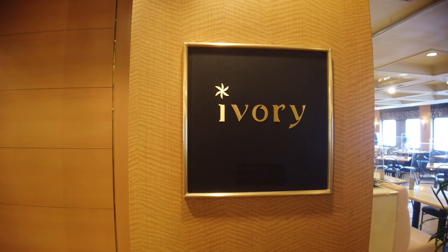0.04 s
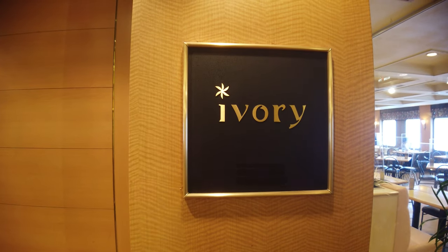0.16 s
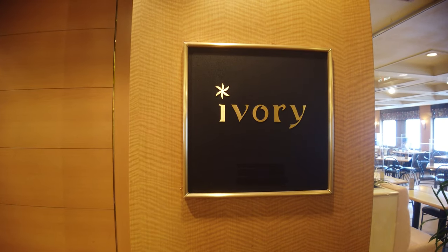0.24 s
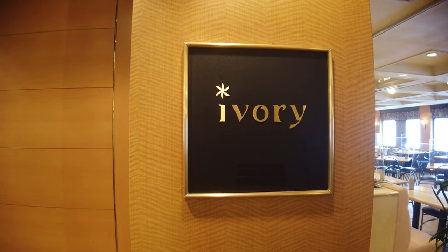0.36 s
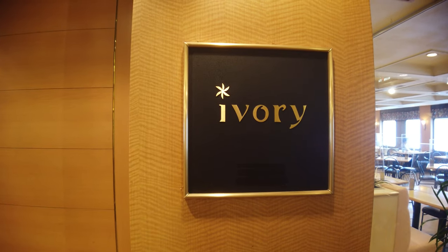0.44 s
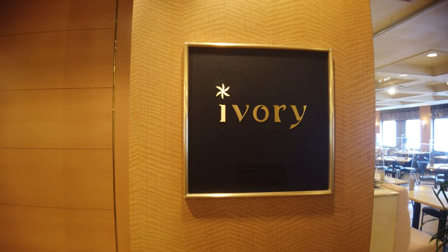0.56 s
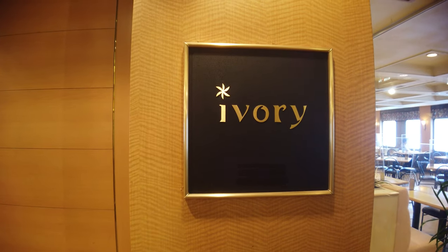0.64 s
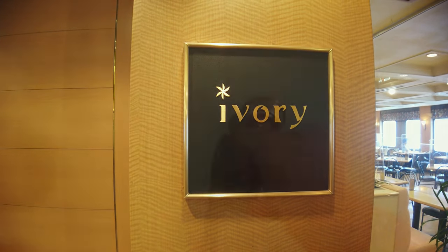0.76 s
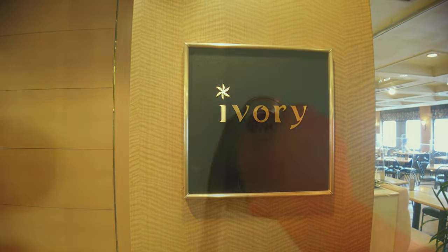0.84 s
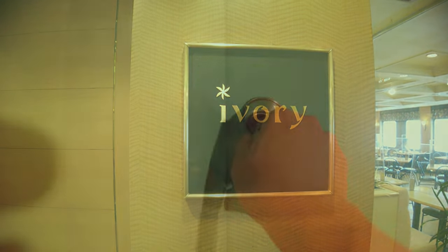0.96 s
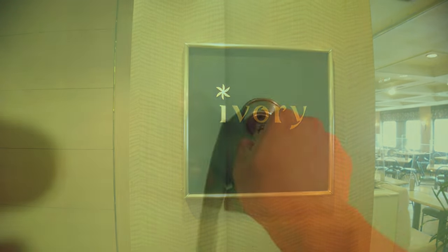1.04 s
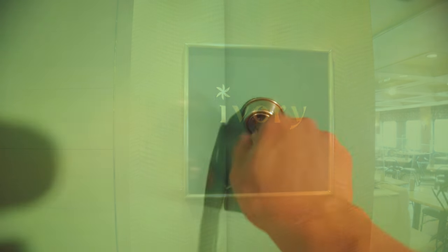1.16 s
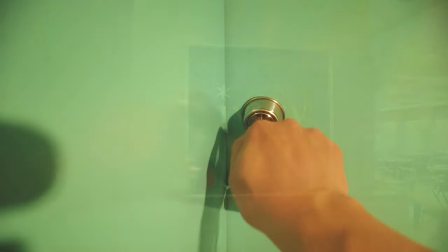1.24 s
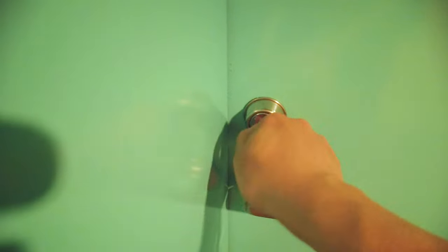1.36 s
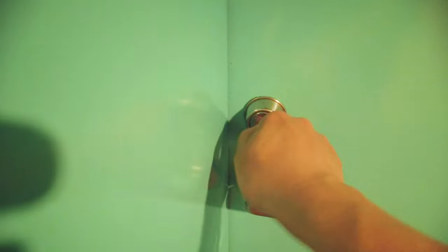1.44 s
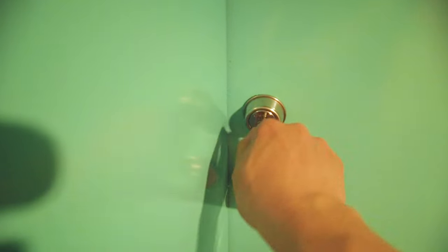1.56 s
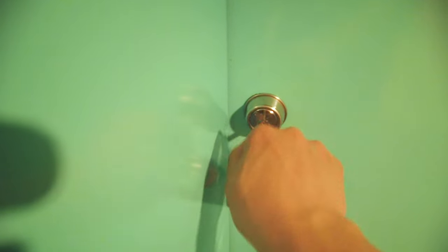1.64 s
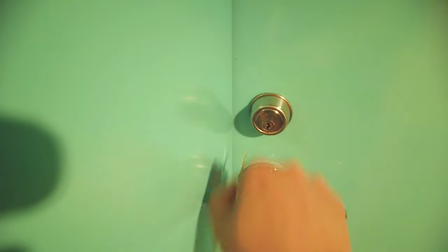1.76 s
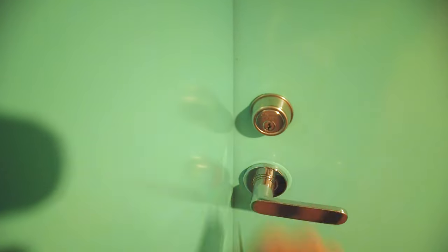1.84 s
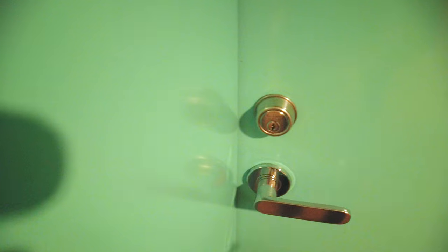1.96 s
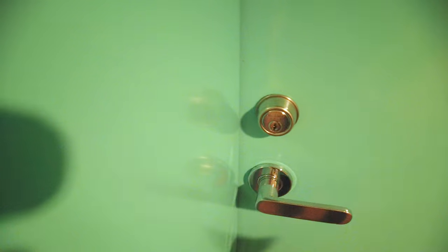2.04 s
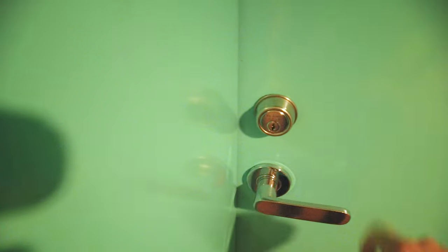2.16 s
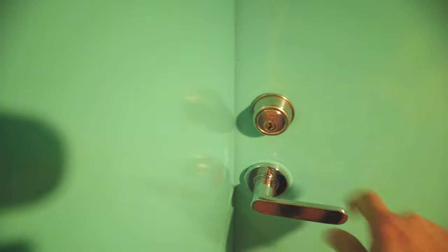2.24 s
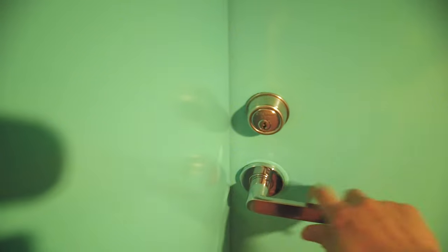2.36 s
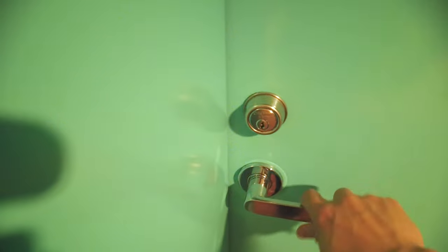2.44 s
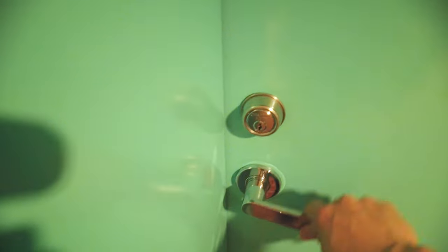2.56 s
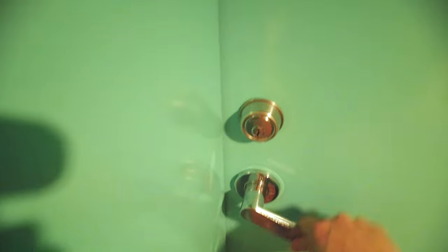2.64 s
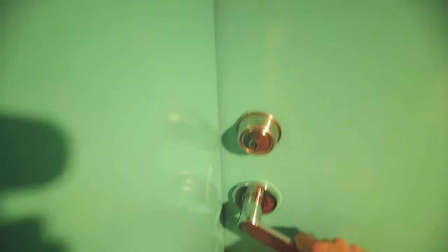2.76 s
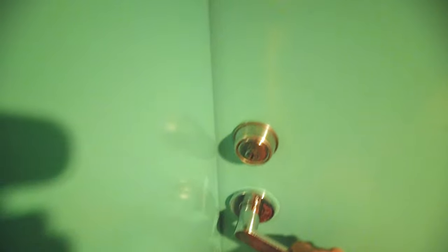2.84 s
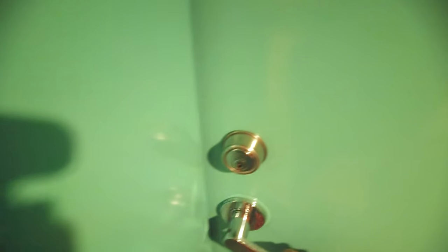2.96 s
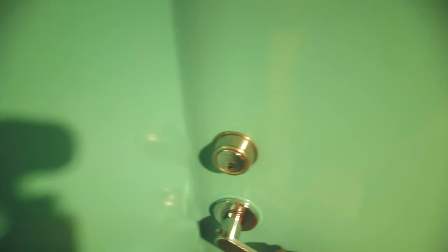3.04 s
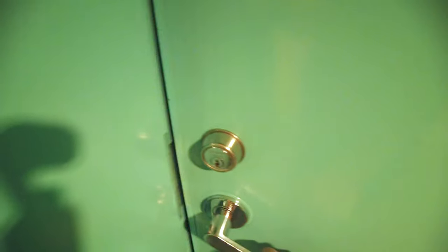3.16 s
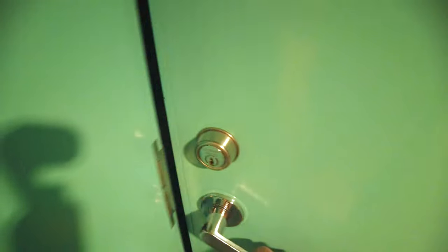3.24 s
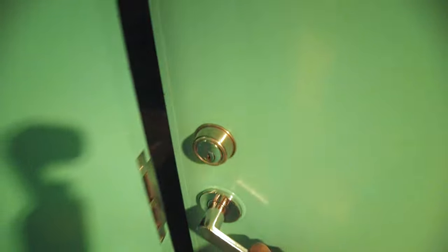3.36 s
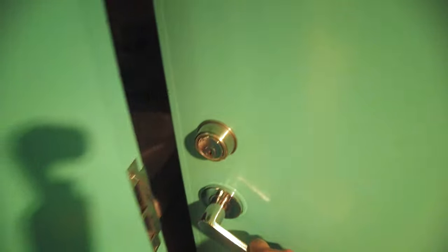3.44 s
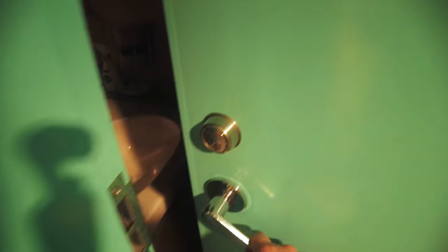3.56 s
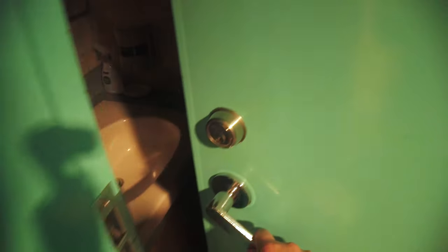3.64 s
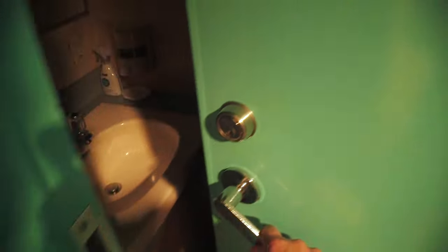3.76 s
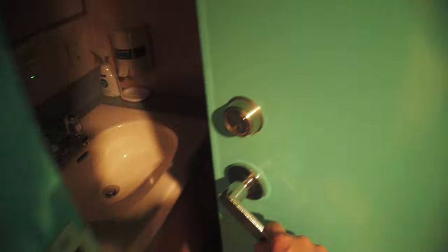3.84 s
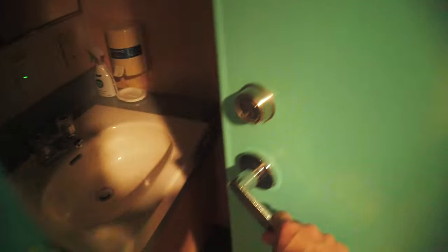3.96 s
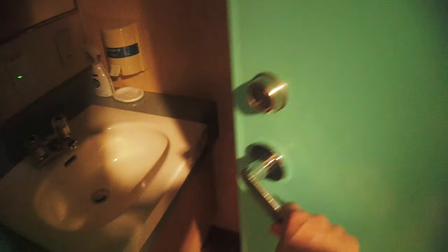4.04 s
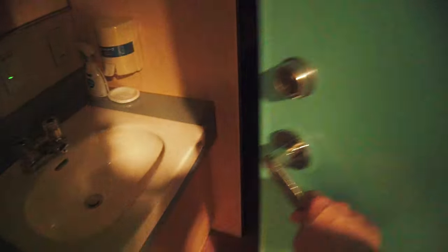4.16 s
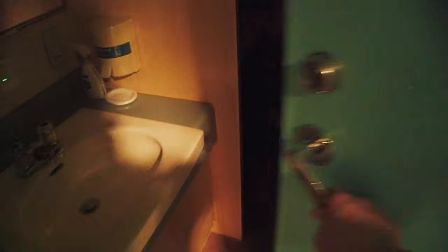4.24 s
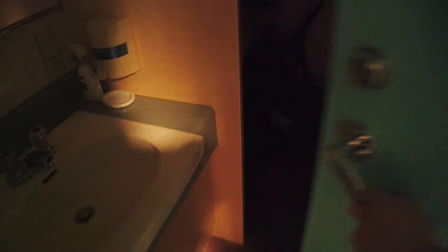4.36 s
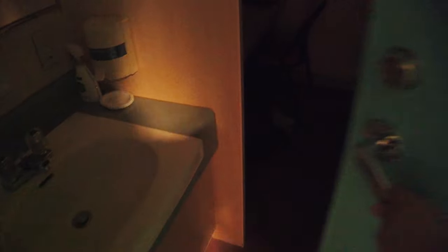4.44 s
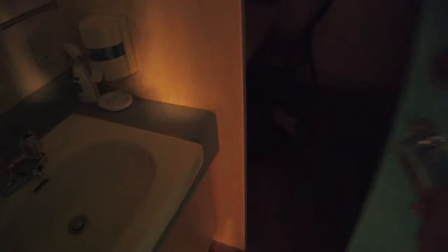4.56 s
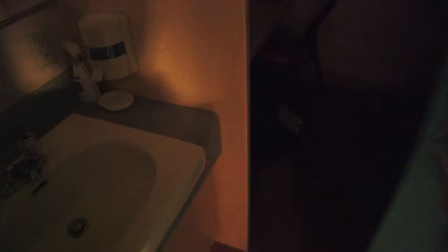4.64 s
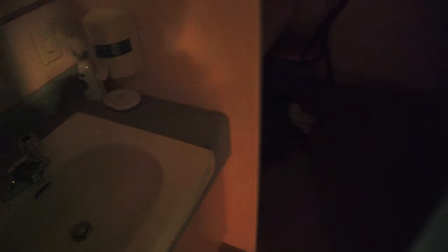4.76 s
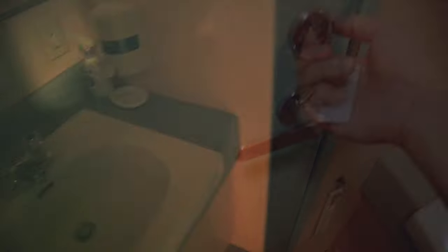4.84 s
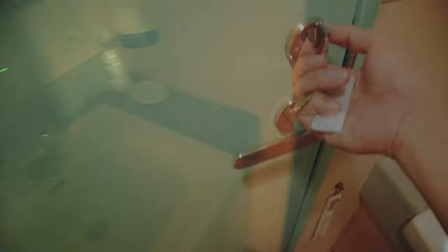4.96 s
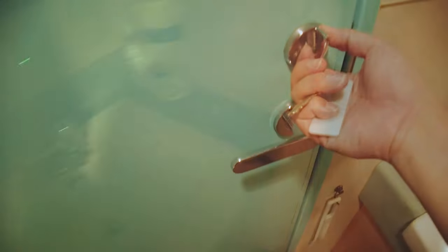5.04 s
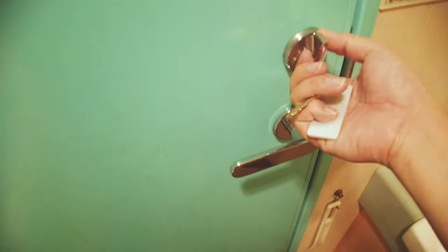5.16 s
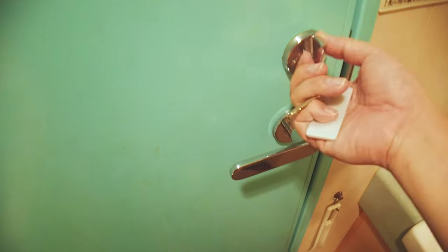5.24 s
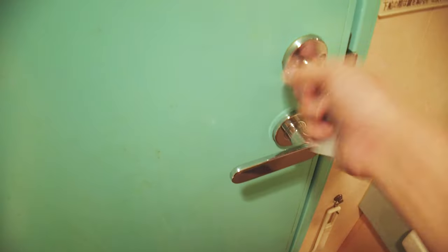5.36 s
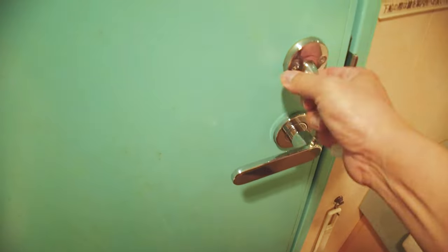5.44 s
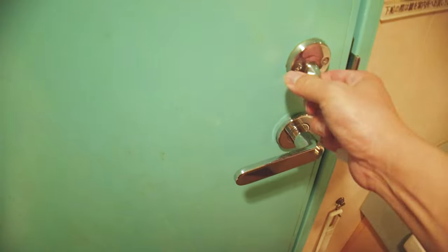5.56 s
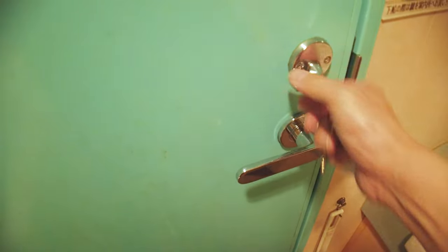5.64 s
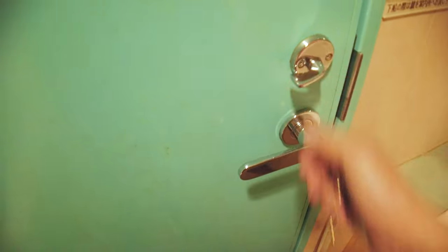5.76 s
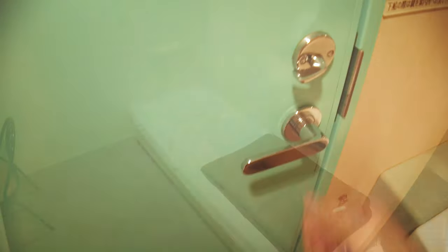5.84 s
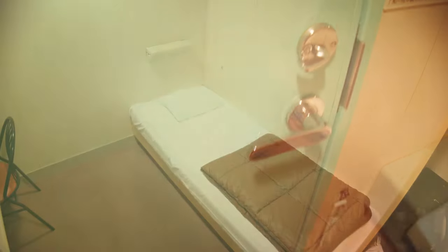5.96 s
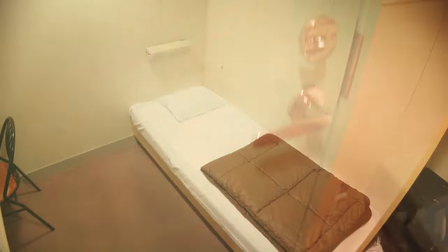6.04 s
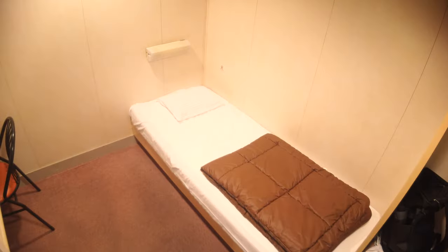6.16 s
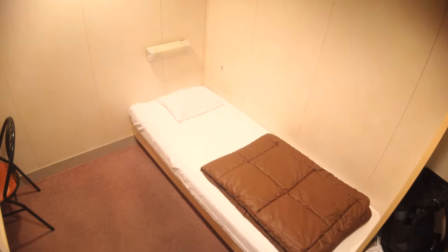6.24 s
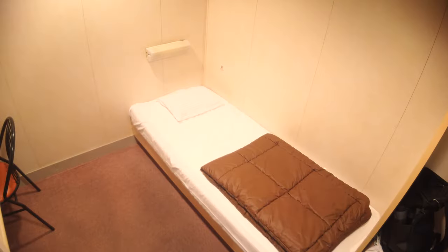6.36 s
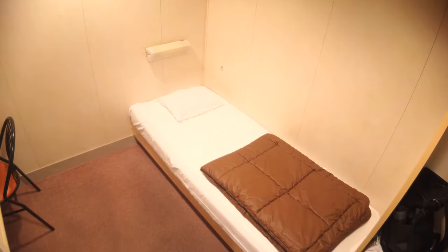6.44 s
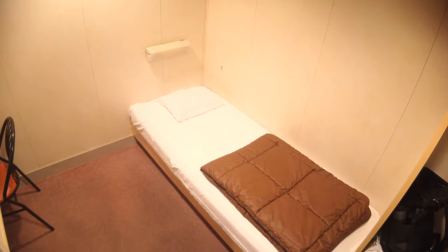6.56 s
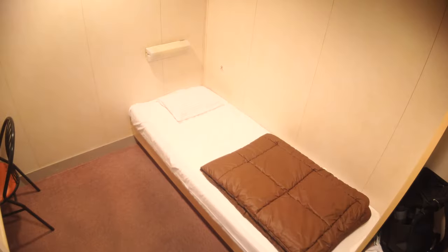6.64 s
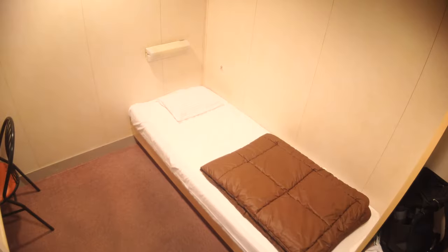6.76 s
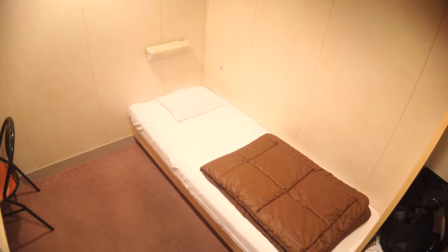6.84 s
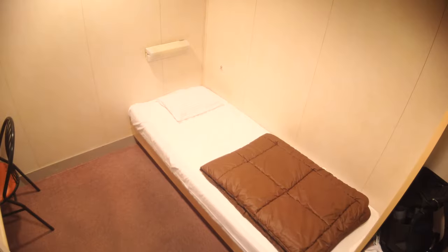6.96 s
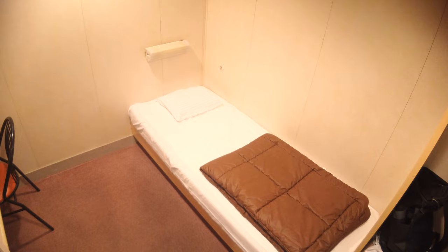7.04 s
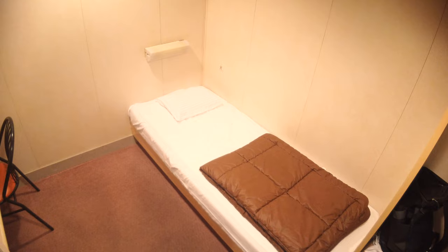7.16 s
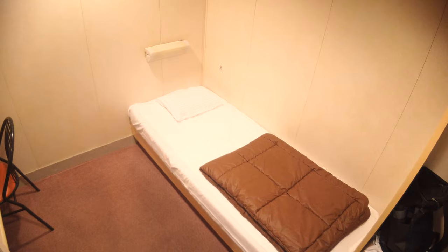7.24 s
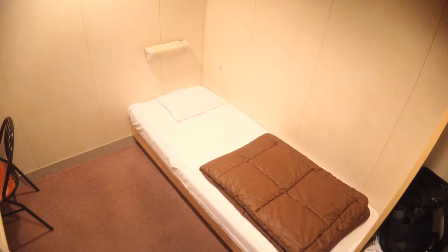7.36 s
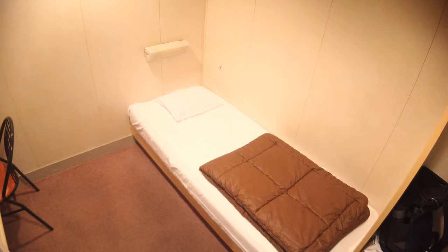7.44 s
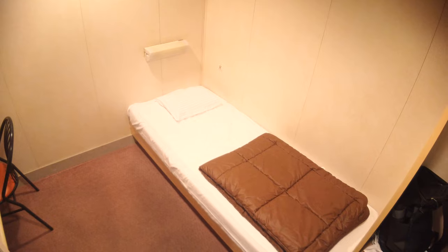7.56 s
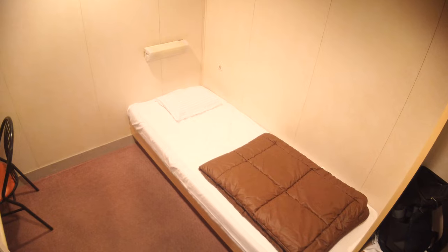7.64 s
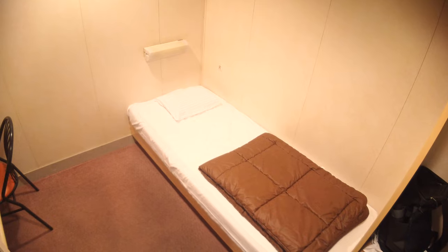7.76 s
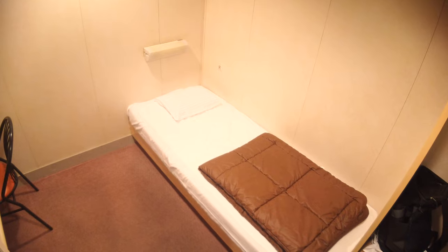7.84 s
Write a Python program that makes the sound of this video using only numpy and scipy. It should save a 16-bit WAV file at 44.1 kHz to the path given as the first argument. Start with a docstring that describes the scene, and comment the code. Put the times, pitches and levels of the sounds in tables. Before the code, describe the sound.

Over a ship's rumble and ventilation, a cabin door is unlocked with clinking keys, scrapes open and is bolted with a sharp clack.

```python
"""A ship's cabin door, near a small camera. A key turns the bolt, key and tag clink, the lever is pushed,
the door scrapes open, the bolt is thrown again from inside, and something creaks by the bed.
Blows, chatter and sliding contact ring the resonances of door, lock and keys. Hull hum and ventilation
rush are shaped noise, different in four places heard in turn: hall, corridor, behind the door, bed."""
import sys
import numpy as np
from scipy import signal
from scipy.fft import rfft, irfft, next_fast_len
from scipy.io import wavfile
from scipy.ndimage import uniform_filter1d, map_coordinates

SR = 44100
rng = np.random.default_rng(int(sys.argv[2]) if len(sys.argv) > 2 else 0)


def generate_wav(sig):
    """Save sig (samples, or channels by samples) to the path in sys.argv[1] as 16-bit PCM at SR."""
    pcm = np.round(np.clip(np.atleast_2d(sig).T, -1, 1) * 32767).astype(np.int16)
    wavfile.write(sys.argv[1], SR, pcm)


N = 348425
T = np.arange(N) / SR


def amp(db):
    return 10 ** (np.asarray(db) / 20)


def unit_rms(x):
    return x / np.sqrt(np.mean(np.abs(x) ** 2) + 1e-20)


def log_interp(points, hz):
    """Interpolate (Hz, value) points on a log axis."""
    f, v = np.transpose(points)
    return np.interp(np.log(hz + 1), np.log(f + 1), v)


def filtered(x, response):
    """Apply a frequency response."""
    m = next_fast_len(N + SR // 2)
    return irfft(rfft(x, m) * response(np.fft.rfftfreq(m, 1 / SR)), m)[..., :N]


def body(modes, top_hz=30000, order=3):
    """Causal resonator bank, damped above top_hz; unit gain for white noise."""
    def response(f):
        rings = sum((-1) ** k * amp(db) * 1j * f * width / (hz * hz - f * f + 1j * f * width)
                    for k, (hz, width, db) in enumerate(modes))
        damping = 1 / (1 + 1j * f / top_hz)
        return unit_rms(rings * damping ** order)
    return response


def body_squared(modes):
    """Resonator bank applied twice: deep valleys between modes."""
    return lambda f: unit_rms(body(modes)(f) ** 2)


def noise():
    """Independent noises for mid and side: sum and difference of the microphone ports."""
    return rng.standard_normal((2, N))


def wobble(knots_per_s):
    """Smooth random curve."""
    return map_coordinates(rng.standard_normal(int(N * knots_per_s / SR) + 4), [T * knots_per_s])


def noise_tone(hz, width_hz):
    """Unsteady tone: narrowband noise."""
    return unit_rms(filtered(noise(), lambda f: np.exp(-((f - hz) / width_hz) ** 2)))


def grit(spread_db):
    """Dense tiny impacts; plain noise at zero spread."""
    return unit_rms(noise() * amp(spread_db * wobble(350)))


def stroke(start_s, end_s, rise_s, fall_s):
    """Gain 1 from start to end; 20 dB per rise and fall time outside."""
    return amp(-20 * (np.clip(start_s - T, 0, None) / rise_s + np.clip(T - end_s, 0, None) / fall_s))


# Hull, one row per place: (shudder [dB], lower engine tone [dB], upper engine tone [dB])
HULL_LEVELS = [(-41, -56, -43.5), (-39.5, -49.5, -49.5), (-35, -43, -43), (-31, -29, -35)]
# Shudder spectrum: (frequency [Hz], relative density [dB])
SHUDDER_SPECTRUM = [(4.7, -35), (8.0, 0.5), (52, -0.5), (68, -48), (110, -120)]
# Engine tones: (frequency [Hz], width [Hz])
ENGINE_TONES = [(57.5, 2.6), (75, 4.7)]
# Level of the low rumble over time: brief rises and falls, with a dip at the loud bolt throw:
# (centre [s], width [s], shudder gain [dB], engine gain [dB])
RUMBLE_GAINS = [(1.521, 0.17, 10, 1), (2.18, 0.072, 9.5, 4.5), (2.93, 0.075, 5, -4), (3.2, 0.4, 4, 4),
                (4.8, 0.21, 7, -0.5), (5.55, 0.055, -9, -9), (5.681, 0.044, 7, -1), (6.07, 0.062, 4, 3),
                (7.12, 0.41, -6, -7.5), (7.5, 0.097, 3.5, 5)]


def hull(place_gains):
    """Low rumble: hull shudder and two engine tones."""
    shudder, lower, upper = amp(HULL_LEVELS).T @ place_gains
    shudder_db, engine_db = sum(np.outer(db, np.exp(-((T - s) / width_s) ** 2))
                                for s, width_s, *db in RUMBLE_GAINS)
    rumble = unit_rms(filtered(noise(), lambda f: amp(log_interp(SHUDDER_SPECTRUM, f))))
    engine = lower * noise_tone(*ENGINE_TONES[0]) + upper * noise_tone(*ENGINE_TONES[1])
    return shudder * amp(shudder_db) * rumble + amp(engine_db) * engine


# Air rush: (frequency [Hz], hall [dB/Hz], corridor [dB/Hz], behind door [dB/Hz], bed [dB/Hz])
RUSH_SPECTRA = [(70, -59, -83.5, -80, -95), (84, -65, -67, -75, -58), (157, -73.5, -75.5, -73.5, -74),
                (252, -75.5, -78.5, -81.5, -80.5), (580, -87.5, -90, -96.5, -94),
                (680, -85.5, -93, -99, -94.5), (1070, -88.5, -97, -104, -101),
                (1950, -93.5, -102, -108, -104), (2724, -96.5, -101, -108, -105),
                (3220, -100, -104, -111, -109), (4550, -112, -114, -118, -116),
                (6630, -115, -122, -123, -119), (11560, -122, -122, -124, -119),
                (14160, -127, -127, -129, -121), (15500, -147, -146, -147, -135)]
# Duct tones: (place [index], frequency [Hz], width [Hz], level [dB])
DUCT_TONES = [(0, 479, 17, -64), (1, 132.3, 3.8, -57.5), (1, 178.6, 20, -58), (1, 310, 6.6, -61.5),
              (1, 354.2, 2.5, -56.5), (1, 477.4, 9, -67), (2, 175, 12, -56), (3, 155.2, 11.4, -54),
              (3, 237.4, 9.3, -62.5), (3, 350, 2.7, -69)]


def ventilation(place_gains):
    """Broadband air rush and unsteady duct tones of each place."""
    out = np.zeros((2, N))
    hz, *spectra = np.transpose(RUSH_SPECTRA)
    for gain, density_db in zip(place_gains, spectra):
        spectrum = np.transpose([hz, density_db])
        rush = filtered(np.sqrt(SR / 2) * noise(), lambda f: amp(log_interp(spectrum, f)) * (f > 50))
        out += gain * amp(0.53 * wobble(6.1)) * rush
    for place, hz, width_hz, db in DUCT_TONES:
        out += place_gains[round(place)] * amp(db) * noise_tone(hz, width_hz)
    return out


# Hall, corridor, behind door, bed: (fade-in start [s], end [s], fade-out start [s], end [s])
PLACE_FADES = [(-1, -.5, .6, 1.3), (.6, 1.3, 5.015, 5.04), (5.015, 5.04, 6.02, 6.036),
               (6.02, 6.036, 9, 9.5)]


def ship():
    """Hull and ventilation, crossfaded from place to place at equal power."""
    place_gains = [np.sin(np.pi / 2 * np.interp(T, edges, [0, 1, 1, 0])) for edges in PLACE_FADES]
    return hull(place_gains) + ventilation(place_gains)


# Reverberation: (frequency [Hz], t60 [s])
WALL_DECAY = [(150, 0.93), (600, 0.59), (2500, 0.4), (6000, 0.41), (9000, 0.21), (14000, 0.24)]


def walls(dry):
    """Narrow steel space: a noise tail with a decay time per frequency."""
    hz, t, spectrum = signal.stft(rng.standard_normal((2, SR // 2)), SR, nperseg=256)
    decay = amp(-60 * t / log_interp(WALL_DECAY, hz)[:, None])
    tail = signal.istft(spectrum * decay, SR, nperseg=256)[1]
    delayed_mid = np.pad(dry[0], (120, 0))[None]
    return signal.fftconvolve(delayed_mid, tail / np.linalg.norm(tail[0]), axes=1)[:, :N]


# Slips by the bed: (time [s], level [dB], rise [s], fall [s])
CREAK_SLIPS = [(7.3, -68.5, .02, .2), (7.35, -71, .02, .1), (7.392, -60.5, 0.013, 0.14),
               (7.435, -73, .02, .1), (7.487, -56, .012, .1), (7.515, -53, 0.027, 0.11),
               (7.56, -62, 0.023, 0.067), (7.615, -66.5, .02, .1), (7.72, -68.5, .05, 0.28)]
# Creaking part: (frequency [Hz], width [Hz], gain [dB])
CREAK_MODES = [(1406, 53, -4.5), (1820, 90, -1.5), (2310, 130, 3.5), (2610, 200, 5), (2940, 160, 7),
               (3600, 60, 3.5)]


def creak():
    """Uneven slips drive a few resonances by the bed."""
    push = sum(amp(db) * stroke(s, s, rise_s, fall_s) for s, db, rise_s, fall_s in CREAK_SLIPS)
    return filtered(push * grit(spread_db=0), body(CREAK_MODES, top_hz=3600, order=7))


# Key ring pings: (time [s], level [dB])
RING_PINGS = [(2.082, -44), (2.123, -47), (2.207, -65.5), (2.27, -59), (2.31, -59.5)]


def key_ring(hz=11740, t60_s=0.204):
    """The ring pings on one high, fluttering note."""
    out = np.zeros(N)
    for s, db in RING_PINGS:
        t = np.clip(T - s, 0, None)
        envelope = amp(db - 60 * t / t60_s + 2.3 * wobble(55)) * (1 - np.exp(-t / .003))
        out += envelope * np.sin(2 * np.pi * hz * t)
    return out


# Squeaks: (start [s], end [s], frequency [Hz], level [dB])
SQUEAKS = [(0.37, 0.598, 1410, -65), (2.24, 2.36, 1440, -59), (2.72, 2.826, 1400, -56.5),
           (2.798, 2.908, 1460, -60), (7.161, 7.302, 930, -62.5)]


def squeaks():
    """Thin whistles, unsteady in pitch and level."""
    out = np.zeros(N)
    for start, end, hz, db in SQUEAKS:
        arch = np.sin(np.pi * np.clip((T - start) / (end - start), 0, 1) ** 0.59)
        envelope = amp(db + 5 * wobble(80)) * arch
        phase = 2 * np.pi * np.cumsum(hz + 35 * wobble(150)) / SR
        out += envelope * np.sin(phase)
    return out


# Door edge catching on the frame: (time [s], level [dB])
EDGE_CATCHES = [(3.1465, -67), (3.175, -54), (3.202, -49), (3.2545, -62), (3.2813, -55), (3.326, -50),
                (3.3655, -53)]
# Door edge: (frequency [Hz], width [Hz], gain [dB])
EDGE_MODES = [(2410, 1150, 5.5), (2760, 304, 15), (3110, 1080, 4)]
# Loose keys, also used by rubbing and tag: (frequency [Hz], width [Hz], gain [dB])
KEY_MODES = [(5560, 900, -4.5), (7000, 650, -3.5), (8980, 1200, -2.5), (9440, 280, -1.5), (9670, 360, -1.5),
             (10700, 580, 0), (11440, 370, -0.5), (12670, 600, -1.5), (14270, 1800, -4.5)]


def door_swing(start_s=3.055, end_s=3.506, growth_db_per_s=31.5, brightening_db_per_s=23):
    """The edge drags past the frame, ever louder and brighter, catching in short bursts."""
    elapsed_s = np.clip(T, start_s, end_s) - start_s
    drag = amp(-67.5 + growth_db_per_s * elapsed_s) * stroke(start_s, end_s, 0.015, 0.16)
    catches = sum(amp(db) * stroke(s, s, 0.0054, 0.016) for s, db in EDGE_CATCHES)
    scrape = filtered((drag + catches) * grit(spread_db=0), body_squared(EDGE_MODES))
    hiss = drag * amp(-22 + brightening_db_per_s * elapsed_s)
    return scrape + filtered(hiss * noise(), body(KEY_MODES))


# Door leaf, door skin, lock plate, lock case: (frequency [Hz], width [Hz], gain [dB])
LEAF_MODES = [(106, 27, 1.5), (174, 15, 3.5), (204.2, 20, -3.5), (234, 43, -2.5)]
SKIN_MODES = [(294, 27, 1), (323, 45, 4.5), (392, 26, 0.5), (508, 34, 3), (430, 250, -3.5)]
PLATE_MODES = [(581, 25, 4.5), (742, 120, 2), (1020, 71, -0.5), (1100, 270, -2), (1410, 53, -11.5),
               (1625, 82, -4.5), (1837, 120, 10.5), (1170, 610, 10.5)]
CASE_MODES = [(2020, 90, -4.5), (2197, 290, 1.5), (2484, 64, 4), (2575, 290, 4.5), (2740, 50, -3),
              (3018, 57, 8.5), (2970, 1260, 6), (3490, 63, -4.5), (4300, 200, -16)]


def door_parts(drives, blows, bright_part, spread_db):
    """Blows and tiny impacts ring five parts: leaf, skin, plate, case and a bright part."""
    parts = (body(LEAF_MODES, top_hz=900), body(SKIN_MODES, top_hz=1620),
             body(PLATE_MODES, top_hz=3600, order=6), body(CASE_MODES, top_hz=5080, order=14),
             bright_part)
    impacts = grit(spread_db)
    mid_only = np.array([[1], [0]])
    return sum(filtered(drive * impacts + blow * mid_only, part)
               for drive, blow, part in zip(drives, blows, parts))


# Hand, key and sleeve strokes:
# (time [s], case level [dB], rise [s], fall [s], plate re case [dB], keys re case [dB])
RUB_STROKES = [(0.202, -50, 0.027, 0.17, -13, -37), (.8, -50, 0.11, 0.036, -11, -7),
               (.88, -57.5, 0.28, 0.066, 4.5, -21), (1.343, -66, 0.0075, 0.022, 11, -30),
               (1.42, -48.5, 0.17, 0.075, 0.5, -8), (1.536, -57.5, 0.016, 0.033, -12, -7),
               (1.665, -53, 0.066, 0.036, 1, -15), (3.04, -51.5, 0.057, 0.036, -15, -7),
               (1.83, -41.5, 0.053, 0.088, -15, -5.5), (1.908, -39.5, 0.03, 0.022, -4, -7),
               (2.115, -48, 0.05, 0.067, -17.5, -2.5), (2.292, -61, .02, .04, -10, 4),
               (2.258, -48.5, 0.03, 0.01, -13, -12), (2.17, -61, 0.041, 0.032, -13, 5),
               (4.28, -68.5, 0.16, 0.13, -6, -4.5), (4.574, -59, 0.13, 0.17, -1, -10),
               (4.782, -45.5, 0.064, 0.081, -0.5, -20), (4.87, -74.5, 0.17, 0.12, -14, 0.5),
               (5.0, -69, 0.17, 0.057, -5, -6), (5.501, -58.5, 0.064, .05, 6, -30),
               (6.106, -63.5, 0.092, 0.11, 2.5, -18), (6.58, -64.5, 0.3, 0.18, 3, -18),
               (7.52, -58.5, 0.34, 0.29, 0, -23)]


def rubbing():
    """Sliding contact drives lock plate, lock case and keys."""
    plate, case, keys = sum(np.outer(amp(db + np.array([plate_db, 0, keys_db])), stroke(s, s, rise, fall))
                            for s, db, rise, fall, plate_db, keys_db in RUB_STROKES)
    return door_parts([0, 0, plate, case, keys], np.zeros(5), body_squared(KEY_MODES), spread_db=0.5)


# Tag on door: (time [s], level [dB], lower ring gain [dB], jingle gain [dB], rattle gain [dB])
TAG_TAPS = [(2.2641, -31, -9, -15.5, 4.5), (2.27, -31, -6, -11, 12), (2.331, -43.5, -3, -22, 9),
            (2.344, -41.5, -4, -23, 15), (2.3523, -19, 1, -10.5, -8.5), (2.359, -26, 5.5, -8, 1.5),
            (2.367, -36, 6, -15, 13), (2.368, -36, 2.5, -21, 6)]
# Tag, lower and upper ring: (frequency [Hz], width [Hz], gain [dB])
TAG_LOW_MODES = [(2540, 150, 0.5), (2963, 170, 1.5), (1780, 240, -17)]
TAG_HIGH_MODES = [(3440, 220, 0)]


def key_tag(rattle_t60_s=0.1, jingle_t60_s=0.061):
    """The plastic tag taps the door: a blow, a short rattle and a burst from the keys."""
    low, high, jingle = np.zeros((3, 2, N))
    t = np.arange(SR // 10) / SR
    for s, db, low_db, jingle_db, rattle_db in TAG_TAPS:
        span = slice(round(s * SR), round(s * SR) + len(t))
        force = amp(db + rattle_db - 25.5 - 60 * t / rattle_t60_s) * rng.standard_normal((2, len(t)))
        force[:, 0] += amp(db + np.array([8, -20]))  # blow: mid, side
        high[:, span] += force
        low[:, span] += amp(low_db) * force
        burst = amp(db + jingle_db - 2 - 60 * t / jingle_t60_s) * (1 - np.exp(-t / .003))
        jingle[:, span] += burst * rng.standard_normal((2, len(t)))
    rings = filtered(low, body(TAG_LOW_MODES)) + filtered(high, body(TAG_HIGH_MODES))
    taps = filtered(rings, body([(2995, 1400, 0)], top_hz=7010))
    return taps + filtered(jingle, body_squared(KEY_MODES))


# Inner door face: (frequency [Hz], width [Hz], gain [dB])
INNER_FACE_MODES = [(211, 7.1, -3), (418, 29, -8), (563, 14, 4.5), (1000, 33, -4.5), (1140, 16, -10.5),
                    (2330, 24, -13), (2496, 37, 1), (2580, 39, 4.5)]


def inner_face(start_s=5.565, level_db=-22, t60_s=0.27):
    """The thin inner face rings on after the bolt is thrown from inside."""
    envelope = (T > start_s) * amp(level_db - 60 * np.abs(T - start_s) / t60_s)
    return filtered(envelope * noise(), body(INNER_FACE_MODES, top_hz=4010))


# Key and lever ticks, also used by lock_contacts: (time [s], level [dB], plate gain [dB],
# jingle gain [dB], lock note gain [dB], lock note [Hz], key note [Hz], t60 [s])
TICKS = [(0.1974, -51.5, -23, -6, 0, 2020, 5900, 0.23), (0.7702, -37.5, -1, -2.5, -10, 2485, 10880, 0.063),
         (0.799, -26.5, -3, -18.5, -20, 2480, 11180, 0.092),
         (1.341, -41.5, -4.5, -12, -0.5, 1830, 5120, 0.096), (1.354, -56, -4, -1.5, 9, 1050, 13600, 0.08),
         (1.364, -53.5, -7, 4.5, -6, 1490, 10200, 0.12), (1.3792, -47.5, -11, -5, -10, 1015, 9600, 0.11),
         (1.416, -43.5, -4, -13, -6, 2470, 9340, 0.033), (1.471, -45, -8, -13, -7, 2450, 11000, 0.058),
         (1.481, -30, 1.5, -9.5, -7.5, 2434, 5490, 0.062), (1.536, -38.5, -9, -1, -21, 2460, 11130, 0.072),
         (1.5683, -46, 2, -21, -16, 1100, 5040, 0.036), (1.658, -29.5, 0.5, -34, -11, 2516, 5810, 0.11),
         (2.0818, -25.5, -32.5, 4, -10.5, 1980, 11650, 0.057), (2.094, -38, -32, -4, -4, 2595, 9390, 0.11),
         (2.112, -43.5, -30, 4.5, 1, 2020, 10930, 0.12), (2.148, -47, -27, 7.5, -4, 2910, 8700, 0.1),
         (2.168, -43.5, -18.5, 1, -11.5, 2300, 11350, 0.05), (2.786, -31, -5, -58, -13, 2750, 5340, 0.081),
         (3.028, -45.5, 8, 3, 1.5, 2900, 8460, 0.094), (5.473, -64, 4, -27, 3, 1270, 7960, 0.14),
         (5.814, -45.5, -14, -39, -7.5, 2380, 5360, 0.11)]


def tick_notes():
    """Each tick rings one rough lock note and one cluster of key notes."""
    out, t = np.zeros((2, N + SR)), np.arange(SR // 5) / SR

    def rough_note(hz, width_hz):
        flutter = uniform_filter1d(rng.standard_normal((2, len(t))), round(SR / width_hz))
        return unit_rms(flutter) * np.sin(2 * np.pi * hz * t)

    for s, db, _, jingle_db, note_db, lock_hz, key_hz, t60_s in TICKS:
        lock = amp(note_db) * rough_note(lock_hz, 140)
        keys = amp(jingle_db - 4.5) * rough_note(key_hz, 800) * (1 - np.exp(-t / 0.0039))
        envelope = amp(db - 60 * t / t60_s) * (1 - np.exp(-t / 0.00071))
        out[:, round(s * SR):][:, :len(t)] += envelope * (lock + keys)
    return out[:, :N]


# Bolt throws and lever stop: (time [s], level [dB], leaf gain [dB], skin gain [dB], plate gain [dB],
# snap gain [dB], blow gain [dB], chatter hold [s], base t60 [s])
BOLT_HITS = [(0.922, -24.5, -19, -16, 2, -24, -9, 0.006, 0.056),
             (0.932, -25, -24, -22, -2, -24, -12, 0.013, 0.092),
             (0.954, -25.5, -27, -14, 2, -23, -6, 0.019, 0.16),
             (0.972, -32, -26, -22, -12, -24, -9, 0.01, 0.079),
             (0.996, -14, -13.5, -17, 2.5, -4.5, 0.5, 0.004, 0.065),
             (1.011, -20, -11.5, -5.5, 3, -13.5, 3, 0.0053, 0.27),
             (1.7895, -24, -21, -4.5, 3, -9, -10, 0.0037, 0.063),
             (1.7948, -23.5, -8, -7.5, -1, -6, 14, 0.0066, 0.08),
             (1.803, -35.5, -2, 9, 6, -6, 11.5, 0.0067, 0.12),
             (1.819, -30, -14, -10, -3, -10, -5, 0.0089, 0.054),
             (1.833, -31, -3, -1, -1, -9, -19, 0.012, 0.053),
             (1.875, -40.5, -8, -1, -10, -8.5, -7, 0.0093, 0.078),
             (1.902, -28.5, -16, -26, -0.5, -18, 3.5, 0.0052, 0.05),
             (1.913, -32, -16, -20, 0.5, -22.5, -3, 0.004, 0.07),
             (2.8937, -35.5, 20, 5, 12, 0, 7.5, 0.002, 0.038), (2.897, -32, 12, 8, 4, -3, 6, 0.003, 0.072),
             (2.913, -41, 17, 7, 7, -7, 1.5, 0.0058, 0.07), (2.95, -52, 23, 17, -2, -15, -5, 0.03, 0.45),
             (5.507, -25, -2.5, -21, 4, -24, 0, 0.007, 0.065),
             (5.519, -19.5, -27, -20, 0.5, -24, -7, 0.013, 0.27),
             (5.542, -32, -24, -16, -5, -15.5, -7.5, 0.01, 0.19),
             (5.5622, -13.5, -34, -20, 0.5, -6.5, 2, 0.012, 0.087),
             (5.583, -16.5, -33, -20.5, 2.5, -13.5, -2, 0.017, 0.075),
             (5.6, -19.5, -23, -23.5, -5, -11.5, -11, 0.0062, 0.051),
             (5.613, -21.5, -21.5, -16, 0, -13, 5, 0.0058, 0.18)]
# Bright snap of the bolt: (frequency [Hz], width [Hz], gain [dB])
SNAP_MODES = [(5340, 1200, -1.5), (7020, 350, -13), (8300, 2300, -2), (9900, 520, 4), (10800, 2600, -5),
              (13200, 630, -1.5), (14270, 3700, -7.5)]


def lock_contacts():
    """Bolt, key and lever strike: a blow, then dying chatter. The door moves longest."""
    drives, blows, t = np.zeros((5, N + SR)), np.zeros((5, N)), np.arange(SR // 2) / SR
    # Per part: leaf, skin, plate, case, snap
    t60_scale = np.array([[2.2], [1.6], [1.1], [.99], [.8]])
    rise_s = np.array([[.004], [.003], [.0015], [.0012], [.008]])
    blow_offset_db = np.array([19.5, 24.5, 19.5, 20.5, -1])
    ticks_as_hits = [(s, db - 0.5, -35, -25, plate_db, jingle_db - 6, -4, .005, t60_s)
                     for s, db, plate_db, jingle_db, *_, t60_s in TICKS]
    for s, db, leaf_db, skin_db, plate_db, snap_db, blow_db, hold_s, t60_s in BOLT_HITS + ticks_as_hits:
        gains = amp(db - 12.5 + np.array([[leaf_db], [skin_db], [plate_db], [0], [snap_db]]))
        decay = amp(-60 * np.clip(t - hold_s, 0, None) / (t60_s * t60_scale))
        attack = 1 - np.exp(-t / rise_s)
        drives[:, round(s * SR):][:, :len(t)] += gains * attack * decay
        blows[:, round(s * SR)] = gains[:, 0] * amp(blow_db + blow_offset_db)
    return door_parts(drives[:, :N], blows, body(SNAP_MODES), spread_db=1)


# Microphone port difference: (frequency [Hz], side re mid [dB])
SIDE_SPECTRUM = [(25, -48.5), (100, -52), (200, -30.5), (380, -22), (700, -13), (1290, -9), (2380, -6),
                 (4400, 3), (8000, -2.5), (15000, -1.5)]


def microphone_ports(mid, side, lead_share=.35):
    """Close ports differ mainly in the treble, partly as sound reaches the left one first."""
    weights = [[np.sqrt(1 - lead_share)], [1j * np.sqrt(lead_share)]]
    shares = filtered(np.array([side, mid]), lambda f: amp(log_interp(SIDE_SPECTRUM, f)) * weights)
    difference = shares.sum(axis=0)
    return np.array([mid + difference, mid - difference])


def scene():
    """Sum all sources as mid and side; return left and right."""
    door = lock_contacts() + tick_notes() + inner_face()
    tag = key_tag()
    reverb = walls(amp(-11.5) * door + amp(-10.5) * tag)
    friction = rubbing() + door_swing() + creak()
    whistles = (key_ring() + squeaks()) * amp([[0], [-3]])
    mid, side = door + tag + reverb + friction + whistles + ship()
    mid[round(6.030 * SR)] += amp(-34)  # faint click as the last place begins
    return microphone_ports(mid, side)


def record(dry, top_hz=15850):
    """The camera's band limit."""
    return filtered(dry, lambda hz: hz < top_hz)


dry = scene()
out = record(dry)
generate_wav(out)
```